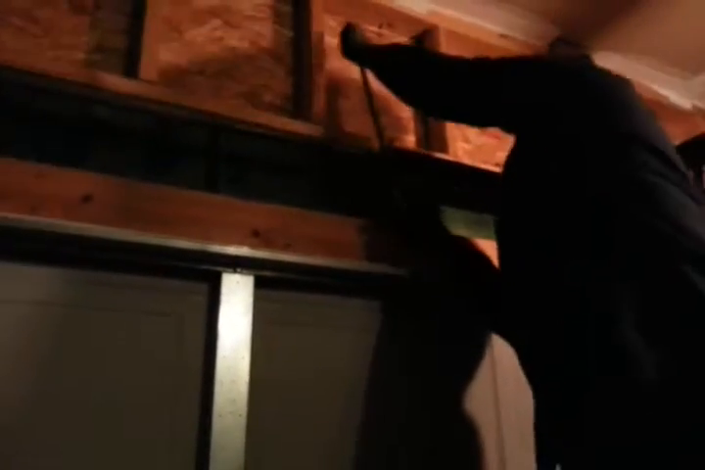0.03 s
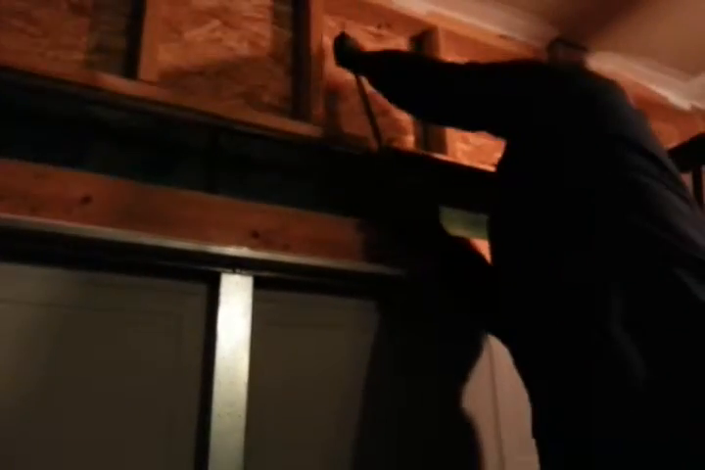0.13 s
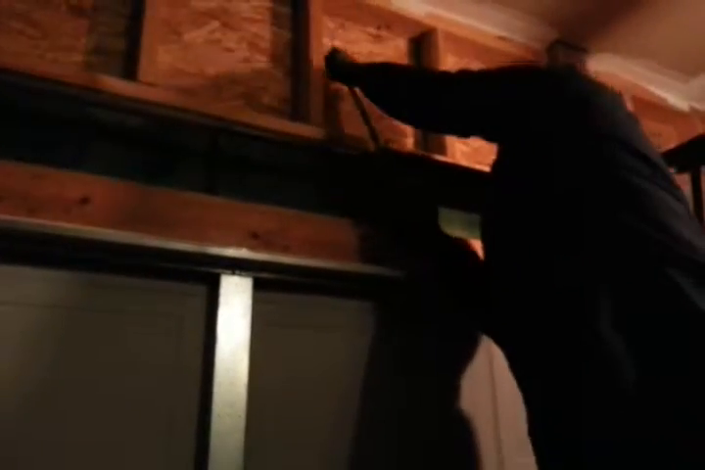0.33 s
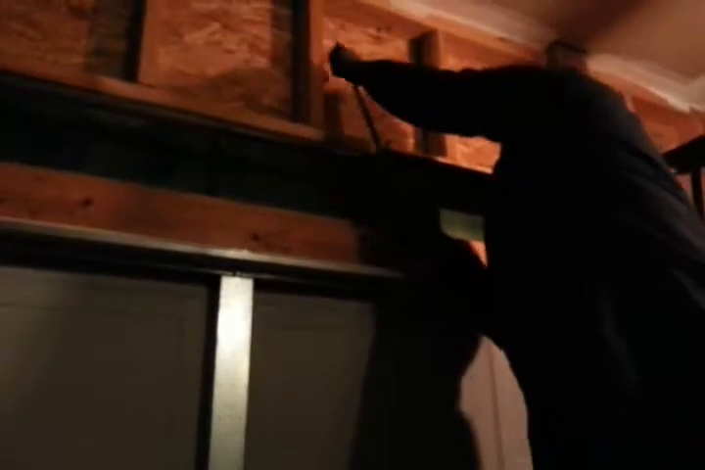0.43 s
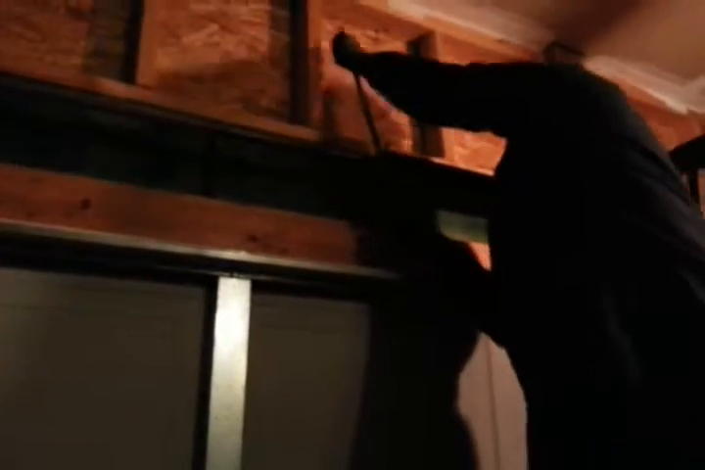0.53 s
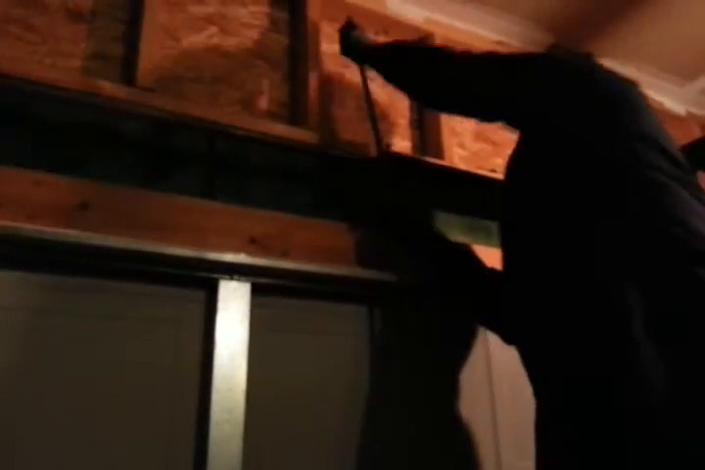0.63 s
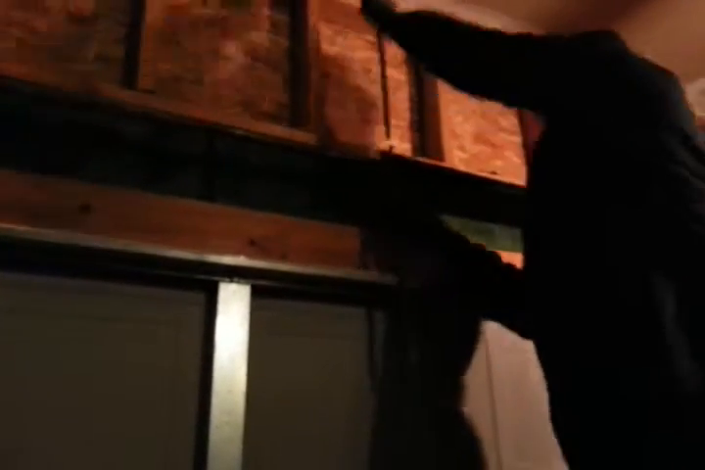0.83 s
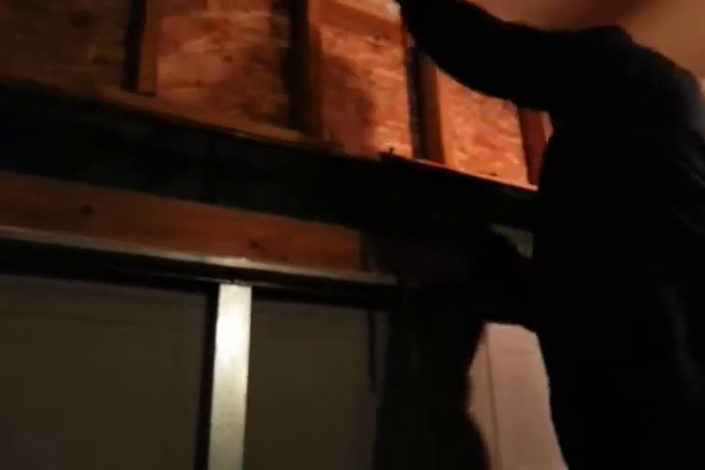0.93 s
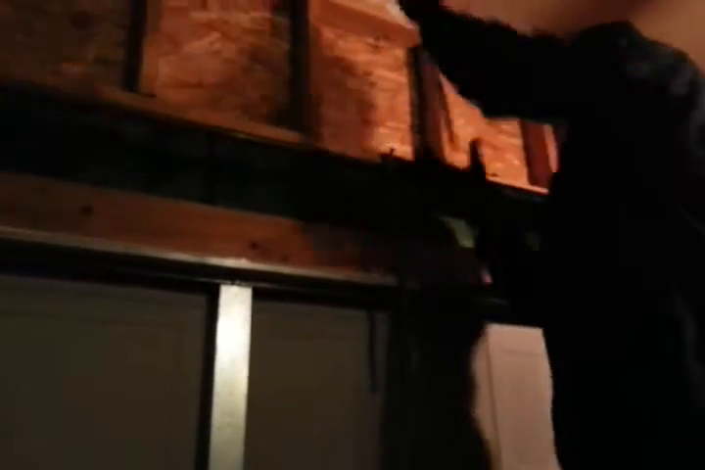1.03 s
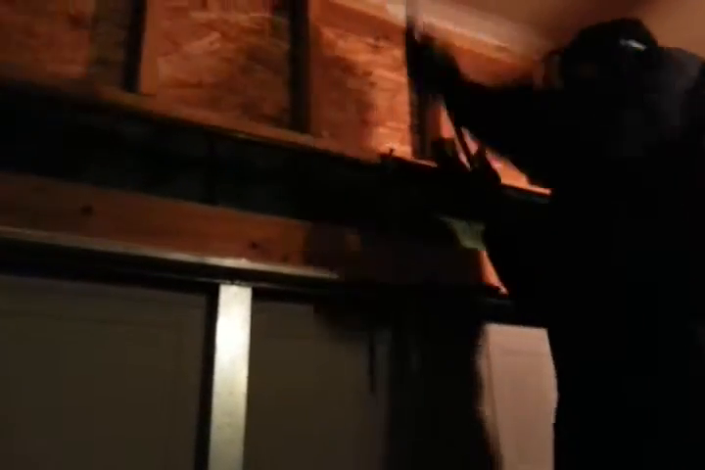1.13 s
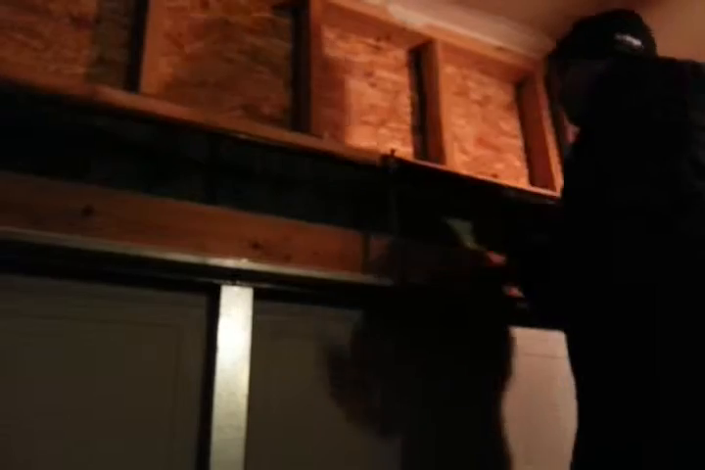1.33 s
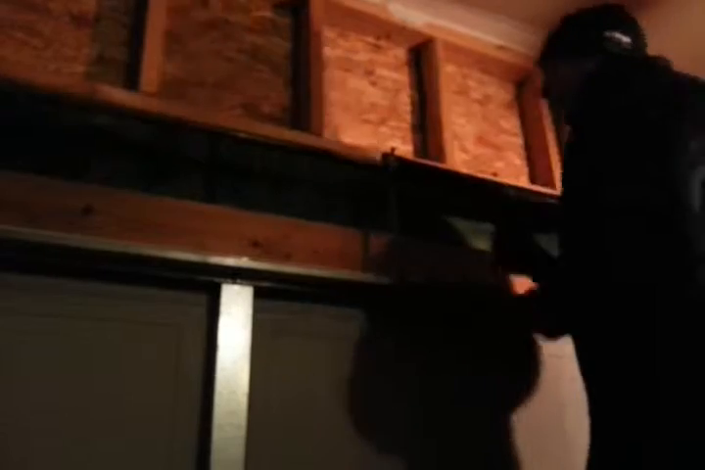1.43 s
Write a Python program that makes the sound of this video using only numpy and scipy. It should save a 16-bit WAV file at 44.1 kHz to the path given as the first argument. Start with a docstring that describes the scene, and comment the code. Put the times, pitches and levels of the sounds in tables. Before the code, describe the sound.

A steel bar strikes metal hardware three times in a reverberant garage, two quick knocks then a much louder clank; loose parts rattle, the echo fades, and sleeves rustle faintly over quiet room hiss.

```python
"""Winding bar at a garage door

A steel winding bar knocks against the spring hardware above a garage door, a few metres from the microphone.
Each knock is a blunt pulse, a click, a noise crack and decaying sines for bar, socket, shaft and door panels;
loose hardware rattles as noise bursts with short pings and bumps. A dense noise tail answers as the garage.
Sleeves rustle as shaped noise over quiet room hiss, two faint tones flutter late, and a limiter holds peaks."""
import sys
import numpy as np
from scipy import signal
from scipy.io import wavfile
from scipy.ndimage import uniform_filter1d

SR = 44100
rng = np.random.default_rng(int(sys.argv[2]) if len(sys.argv) > 2 else 0)


def voltage_ratio(decibels):
    """Convert decibels (scalar or array-like) to amplitude ratios, 20 dB per decade."""
    exponent = np.asarray(decibels, float) / 20
    return 10 ** exponent


def to_wav(sig):
    """Store sig (one row per channel, or 1-D mono) as 16-bit WAV at the path in sys.argv[1].

    Samples outside -1..1 are clipped; the rate is SR.
    """
    pcm = np.clip(np.atleast_2d(sig), -1, 1) * 32767
    pcm = np.round(pcm).astype(np.int16)
    wavfile.write(sys.argv[1], SR, pcm.T)  # frames by channels


N = 66150  # samples, 1.5 s

# Sharp crack of steel on steel. Each row: frequency in Hz, relative spectrum level in dB.
CRACK_SPECTRUM = [(500, -62.5), (900, 5.5), (1500, 2.5), (2270, 1), (2900, -9), (3500, -10), (4200, -2.5),
                  (5000, 0.5), (6000, 1), (8000, -1), (10400, -6.5), (12700, -27), (14600, -49.5)]
STRIKE_RISE_S = 0.00079  # onset of the clank and of the rattle's ping


def evened(x):
    """Scales to rms 1."""
    return x / np.sqrt(np.mean(x ** 2) + 1e-20)


def read(points, hz):
    """Reads a table along log frequency."""
    f, value = np.transpose(points)
    return np.interp(np.log(hz + 1), np.log(f + 1), value)


def add(mix, s, sound, pan_db=0):
    """Mixes a sound into both channels at time s, the left pan_db above the right."""
    part = mix[:, round(s * SR):][:, :len(sound)]
    part += sound[:part.shape[1]] * voltage_ratio(np.array([[pan_db / 2], [-pan_db / 2]]))


def pair(frames, size, same, shape):
    """Two channels of noise from random short-time spectra with the given likeness and magnitude."""
    hz = np.fft.rfftfreq(size, 1 / SR)
    a, b, c, d = rng.standard_normal((frames, len(hz), 4)).T
    same = np.clip(read(same, hz), 0, 1)[:, None]
    left = a + 1j * b
    right = same * left + np.sqrt(1 - same ** 2) * (c + 1j * d)
    spectra = np.array([left, right]) * shape(hz, np.arange(frames) * size / 4 / SR)
    return signal.istft(spectra, nperseg=size, noverlap=size * 3 // 4)[1]


def ring(modes, t, luck, rise_s):
    """Decaying sines of a struck body; luck feeds each mode a little differently."""
    scatter_db = 1.2
    hz, db, t60 = np.transpose(modes)[:, :, None]
    db = db + scatter_db * luck[:len(modes), None]
    sines = voltage_ratio(db - 60 * t / t60) * np.sin(2 * np.pi * hz * t)
    return sines.sum(0) * (1 - np.exp(-t / rise_s))


def colour(x, db_of):
    """Minimum-phase filter with the magnitude db_of(Hz), so nothing sounds ahead of its cause."""
    log = np.log(voltage_ratio(np.maximum(db_of(abs(np.fft.fftfreq(4096, 1 / SR))), -100)))
    taps = np.fft.ifft(np.exp(np.conj(signal.hilbert(log)))).real[:2048]
    return signal.fftconvolve(x, taps)[:len(x)]


def burst(spectrum, envelope):
    """Coloured noise under an envelope."""
    noise = rng.standard_normal(len(envelope))
    return evened(colour(noise, lambda hz: read(spectrum, hz))) * envelope


def blow(t):
    """Impact of the bar: one blunt pulse, plus the crack's spectrum as one sharp click."""
    # Blunt pulse. Each row: frequency in Hz, relative magnitude in dB.
    push_spectrum = [(60, -10.5), (150, -1), (300, -2), (420, 2), (520, 7), (750, 3.5), (1000, 5),
                     (1500, -7), (3000, -15)]
    push_db, click_db = 25, 18.5
    impulse = 1. * (t == 0)
    push = voltage_ratio(push_db) * colour(impulse, lambda hz: read(push_spectrum, hz))
    click = colour(impulse, lambda hz: read(CRACK_SPECTRUM, hz))
    return push + voltage_ratio(click_db) * click / np.linalg.norm(click)


def crack(t):
    """Noise burst of scraping steel, with a very fast onset and a short decay."""
    level_db, t60_s, rise_s = -5, 0.028, 0.00067
    return burst(CRACK_SPECTRUM, voltage_ratio(level_db - 60 * t / t60_s) * (1 - np.exp(-t / rise_s)))


def shaft_and_door(t, shaft_luck, door_luck, thud_db):
    """Long modes of shaft and spring, with the slower-building modes of the door panels."""
    # Shaft and spring ringing on. Each row: frequency in Hz, relative level in dB, t60 in seconds.
    shaft_modes = [(490.9, -8, 0.44), (492.5, -11, 0.54), (402.3, -24, 0.28), (631, -28, 0.67),
                   (689.7, -21.5, 0.59), (830, -15, 0.24), (931, -14, 0.31), (1147.7, -27.5, 0.54),
                   (1190, -19, .4), (1333, -27.5, 0.58), (2220, -19, 0.41), (5780, -35, 0.42)]
    # Door panels. Each row: frequency in Hz, relative level in dB, t60 in seconds.
    door_modes = [(102.8, -45, 1.6), (110.95, -26.5, 1.9), (155.1, -26, 1.08), (165.8, -29, 1.2),
                  (198, -27, 0.37), (298, -37, 0.8), (300, -44, 0.2), (398, -32, 0.77)]
    shaft_rise_s, door_rise_s = 0.028, 0.049
    door = voltage_ratio(thud_db) * ring(door_modes, t, door_luck, door_rise_s)
    return ring(shaft_modes, t, shaft_luck, shaft_rise_s) + door


def knocks():
    """Bar knocks as four stereo tracks: clanks, long ringing, hollow tocks, cracks heard only direct."""
    # The knocks. Each row: start in seconds, strength in dB, treble shelf in dB, door thud in dB,
    # left over right in dB.
    hits = [(.234, -14.5, -4, -3, 2.5), (.3703, -12, -9, -1, 1.7), (0.6629, -5, 0, 4, 1.65)]
    # Short clank of the bar in its socket. Each row: frequency in Hz, relative level in dB, t60 in seconds.
    clank_modes = [(5800, -11.5, 0.0062), (4850, -15, 0.0077), (9440, -8.5, 0.0089)]
    # Hollow knock of the socket. Each row: frequency in Hz, relative level in dB, t60 in seconds.
    tock_modes = [(979, 0, 0.032), (1094, -1, 0.026), (1137, -6.5, 0.043), (1245, -17, 0.014)]
    tock_rise_s, treble_hz, thud_hz = 0.0014, 1730, 400
    t = np.arange(SR) / SR
    tracks = np.zeros((4, 2, N))
    clanks, rings, tocks, near = tracks
    impact = blow(t)
    for s, db, treble_db, thud_db, pan_db in hits:
        luck = rng.standard_normal((3, 16))

        def hardness(hz):
            treble = treble_db / (1 + (treble_hz / (hz + 1)) ** 2)
            return treble + thud_db / (1 + (hz / thud_hz) ** 2)

        clank = impact + ring(clank_modes, t, luck[0], STRIKE_RISE_S)
        add(clanks, s, voltage_ratio(db) * colour(clank, hardness), pan_db)
        add(near, s, voltage_ratio(db) * colour(crack(t), hardness), pan_db)
        add(rings, s, voltage_ratio(db) * shaft_and_door(t, luck[1], luck[2], thud_db), pan_db)
        add(tocks, s, voltage_ratio(db) * ring(tock_modes, t, luck[0], tock_rise_s), pan_db)
    return tracks


def rattles():
    """Loose hardware: noise burst, ping and a later bump on the door, on the same tracks as the knocks."""
    # The rattles. Each row: start in seconds, rattle level in dB, time to fall 20 dB in seconds,
    # bump delay in seconds, bump level in dB.
    shakes = [(0.0965, -40.5, 0.06, 0.00812, -27.5), (0.241, -21.5, 0.035, 0.00715, -10)]
    # Rattling noise. Each row: frequency in Hz, relative spectrum level in dB.
    rattle_spectrum = [(500, -48), (1400, -9), (2200, 7.5), (3000, -1.5), (4000, 0.5), (5500, -4.5),
                       (7500, -5.5), (10000, -14), (13000, -20), (14600, -11)]
    # Loose part struck at the start. Each row: frequency in Hz, relative level in dB, t60 in seconds.
    ping_modes = [(3890, 8.5, 0.019), (4420, -1.5, 0.0088), (3070, -2, 0.024)]
    # Bump on the door. Each row: frequency in Hz, relative level in dB, t60 in seconds.
    bump_modes = [(183, -11, 0.13), (216.3, -1.5, 0.06), (283.7, 4.5, 0.052), (353, -7, 0.057),
                  (517.3, -3, 0.091)]
    pan_db, bump_rise_s = 2, 0.0052
    t = np.arange(SR) / SR
    tracks = np.zeros((4, 2, N))
    _, rings, noises, near = tracks
    for s, db, fall_s, delay, bump_db in shakes:
        add(noises, s, burst(rattle_spectrum, voltage_ratio(db - 20 * t / fall_s)), pan_db)
        ping = ring(ping_modes, t, rng.standard_normal(8), STRIKE_RISE_S)
        add(near, s, voltage_ratio(db) * ping, pan_db)
        bump = ring(bump_modes, t, rng.standard_normal(8), bump_rise_s)
        add(rings, s + delay, voltage_ratio(bump_db) * bump, pan_db)
    return tracks


def garage():
    """Dense tail of the garage as a noise response, each band dying at its own speed; left energy 1."""
    # Decay of the garage. Each row: frequency in Hz, t60 in seconds.
    decay = [(100, 1.23), (200, 1.05), (500, 0.72), (1000, 0.52), (3000, 0.64), (6000, 0.45), (9000, 0.33),
             (13000, 0.15)]
    # Left-right likeness of the tail. Each row: frequency in Hz, likeness from 0 to 1.
    likeness = [(60, 0.98), (150, 0.94), (370, 0.98), (600, 0.47), (920, 0.2), (2290, 0), (5700, 0)]
    first_echo_s, rise_s = 0.0024, 0.0016
    tail = pair(480, 512, likeness, lambda hz, t: voltage_ratio(-60 * t / read(decay, hz)[:, None]))
    t = np.arange(tail.shape[1]) / SR
    tail = tail * (1 - np.exp(-np.maximum(t - first_echo_s, 0) / rise_s))
    return tail / np.linalg.norm(tail[0])


def patchy_noise(spectrum, patch_db, flicker_db):
    """Stereo noise of rms 1 with soft patches in time and pitch and a flicker shared by all bands."""
    # Left-right likeness of the noise. Each row: frequency in Hz, likeness from 0 to 1.
    likeness = [(60, 1), (180, 0.89), (530, 0.64), (1590, 0.031), (4750, 0.015), (14200, 0.03)]
    frames = N // 128 + 5
    patches = uniform_filter1d(rng.standard_normal((frames, 257)), 14, 0)
    patches = evened(uniform_filter1d(patches, 6, 1)).T
    flicker = evened(uniform_filter1d(rng.standard_normal(frames), 2))

    def shape(hz, t):
        return voltage_ratio(read(spectrum, hz)[:, None] + patch_db * patches + flicker_db * flicker)

    return evened(pair(frames, 512, likeness, shape)[:, :N])


def rustle(t):
    """Sleeves and bar sliding as the worker moves: patchy noise riding a level curve."""
    # Level of the movement. Each row: time in seconds, level in dB.
    movement = [(0, -47), (.09, -41.5), (.2, -45), (0.234, -32.5), (.3, -49.5), (1.15, -53.5),
                (1.178, -45.5), (1.2, -48.5), (1.27, -48), (1.352, -41.5), (1.43, -41), (1.5, -43)]
    # Rustling noise. Each row: frequency in Hz, relative spectrum level in dB.
    rustle_spectrum = [(250, -51), (560, 3.5), (700, -3), (912, -1), (1200, -10.5), (2000, -2), (2760, -5),
                       (4000, -6), (5090, -0.5), (6500, -8.5), (10600, -19), (12000, -30.5), (14600, -31)]
    noise = patchy_noise(rustle_spectrum, patch_db=1.1, flicker_db=1.5)
    return voltage_ratio(np.interp(t, *np.transpose(movement))) * noise


def flutter(t):
    """A faint pair of beating tones with wandering phase, under the late rustle."""
    tones_hz, level_db, start_s, rise_s = (890, 935), -51, 1.25, 0.04
    drift = np.cumsum(rng.standard_normal((2, N)), 1) * 0.007
    tones = np.sin(2 * np.pi * np.array(tones_hz)[:, None] * t + drift).sum(0)
    return voltage_ratio(level_db) * np.clip((t - start_s) / rise_s, 0, 1) * tones


def room_hiss():
    """Quiet steady room noise with soft patches."""
    # Room hiss. Each row: frequency in Hz, relative spectrum level in dB.
    hiss_spectrum = [(25, -28), (60, -44), (120, 9), (200, -10), (518, -4.5), (812, -11.5), (937, -6),
                     (1730, -11), (2100, -12), (3120, -31), (4980, -29.5), (14600, -57)]
    level_db = -44
    return voltage_ratio(level_db) * patchy_noise(hiss_spectrum, patch_db=2.5, flicker_db=0)


def lean(x, table):
    """Tilts the left-right balance by frequency."""
    left = colour(x[0], lambda hz: read(table, hz) / 2)
    right = colour(x[1], lambda hz: -read(table, hz) / 2)
    return np.array([left, right])


def scene():
    """Knocks and rattles, their echo in the garage, the rustle, the flutter and the room hiss."""
    # Balance of the hardware and its echo. Each row: frequency in Hz, left minus right in dB.
    hardware_lean = [(60, 0), (110, -2.5), (200, -2), (370, 1.5), (680, -3.5), (1250, 1), (2290, 2.5),
                     (4210, 7), (7730, -6.5), (14200, -5.5)]
    # Balance of rustle and hiss. Each row: frequency in Hz, left minus right in dB.
    background_lean = [(60, 3.5), (240, 3), (920, 0.5), (3620, 5), (14200, -6.5)]
    clank_room_db, ring_room_db, tock_room_db = 6.5, -6.5, -0.5
    clank_direct_db = -8  # the blunt pulse and click arrive mostly by way of the walls
    t = np.arange(N) / SR
    clanks, rings, tocks, near = knocks() + rattles()
    send = voltage_ratio(clank_room_db) * clanks + voltage_ratio(ring_room_db) * rings + voltage_ratio(tock_room_db) * tocks
    echo = signal.fftconvolve(send, garage(), axes=1)[:, :N]
    direct = voltage_ratio(clank_direct_db) * clanks + rings + tocks + near
    background = rustle(t) + room_hiss()
    return lean(direct + echo, hardware_lean) + lean(background, background_lean) + flutter(t)


def band_limit(x):
    """A steep low-pass at the top of the band."""
    return signal.sosfilt(signal.butter(12, 14780, fs=SR, output="sos"), x)


def record(dry):
    """Microphone low cut, a limiter that falls fast and returns slowly, and a treble band limit."""
    low_cut_hz, edge_hz = 58, 14700
    knee_db, share, back_db_per_s = -13, 0.63, 82  # share: part of the excess taken away
    cut = signal.sosfilt(signal.butter(3, low_cut_hz, "high", fs=SR, output="sos"), dry)
    power_db = 10 * np.log10(abs(uniform_filter1d((cut ** 2).mean(0), 89)) + 1e-12)
    # a running maximum over a rising line gives instant attack and a straight release in dB
    back = np.arange(N) * back_db_per_s / SR
    over_db = np.maximum.accumulate(share * (power_db - knee_db) + back) - back
    held = cut / voltage_ratio(uniform_filter1d(np.maximum(over_db, 0), 45))
    low_pass = signal.firwin(511, edge_hz, window=("kaiser", 9), fs=SR)
    edged = signal.oaconvolve(held, low_pass[None], "same")
    return band_limit(np.clip(edged, -1, 1))


dry = scene()
out = record(dry)
to_wav(out)
```